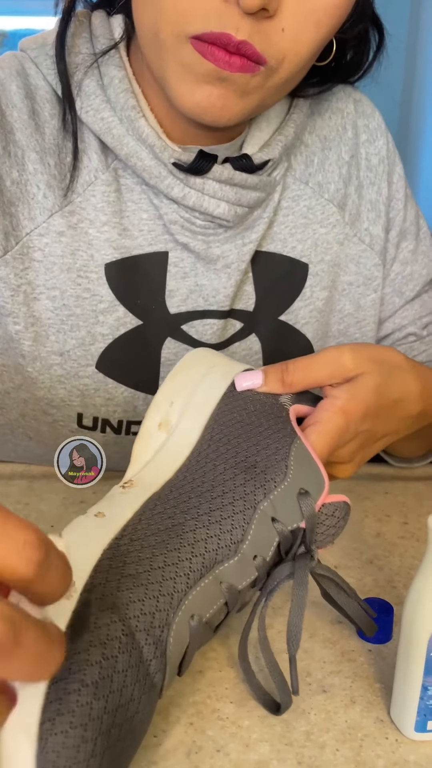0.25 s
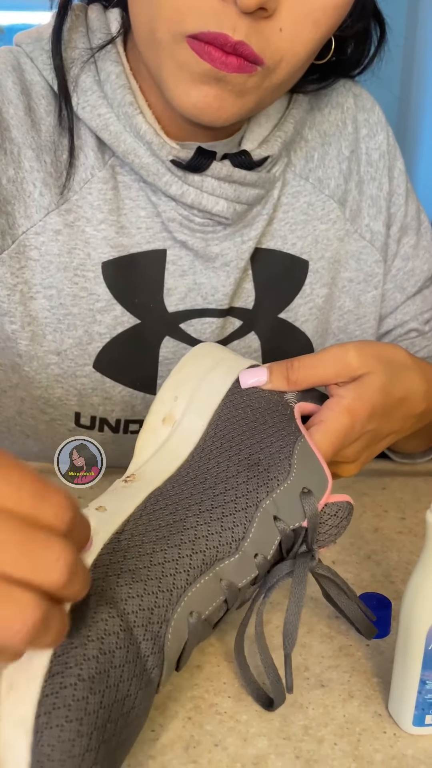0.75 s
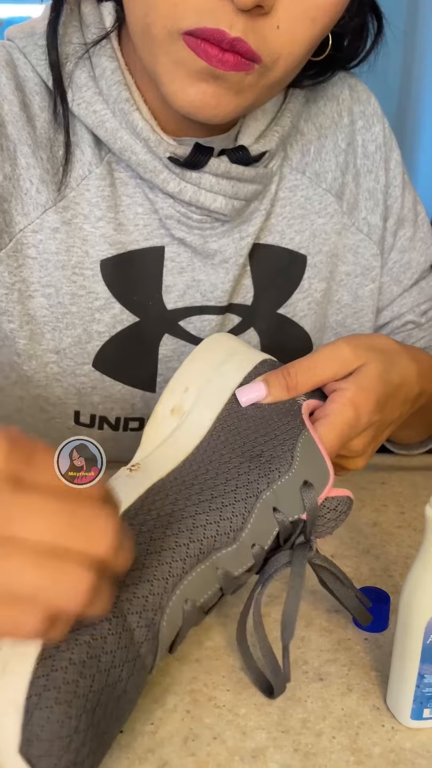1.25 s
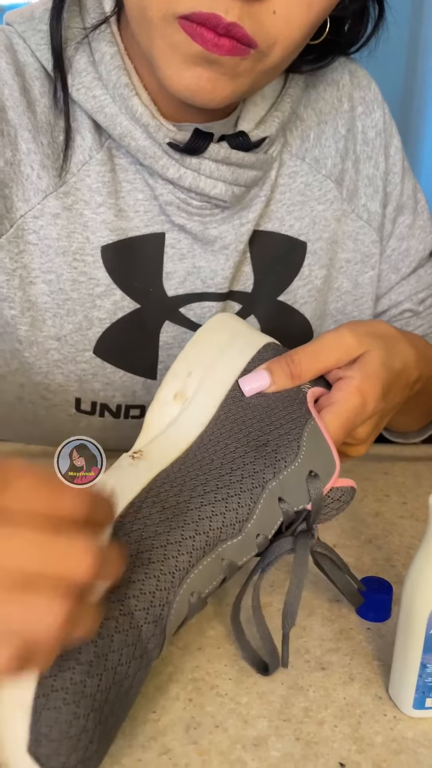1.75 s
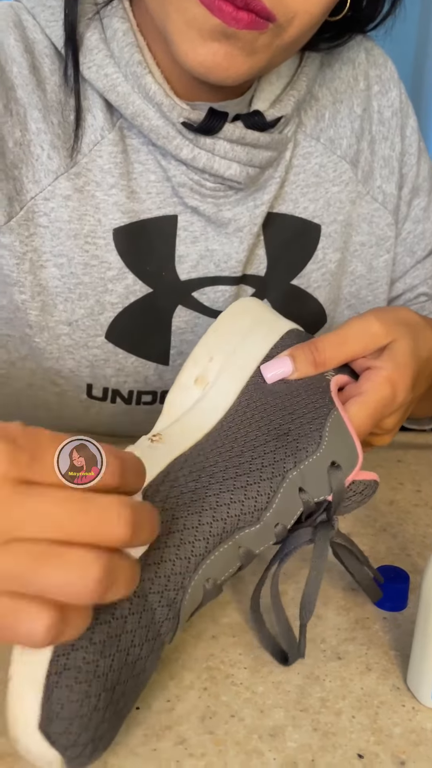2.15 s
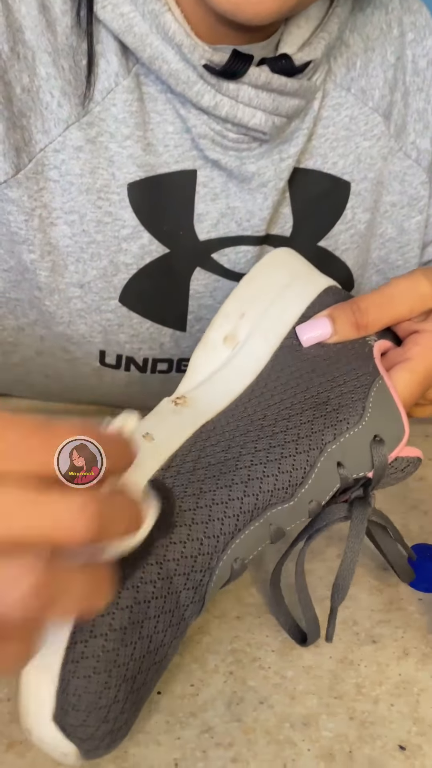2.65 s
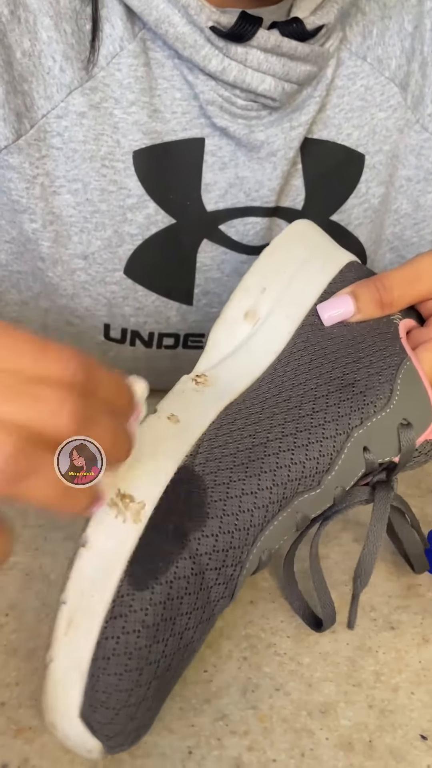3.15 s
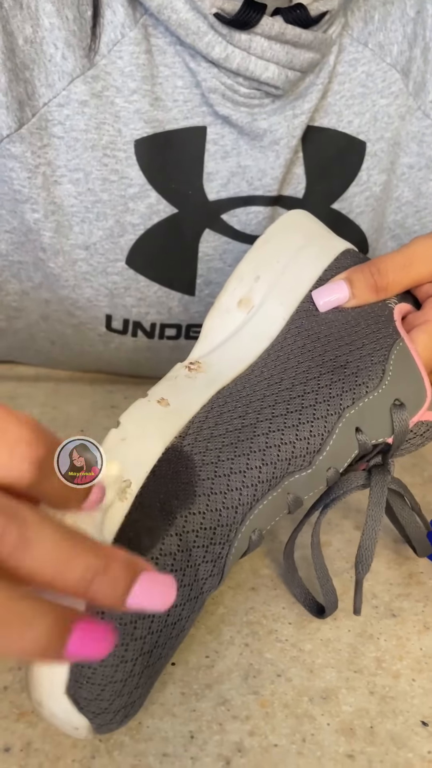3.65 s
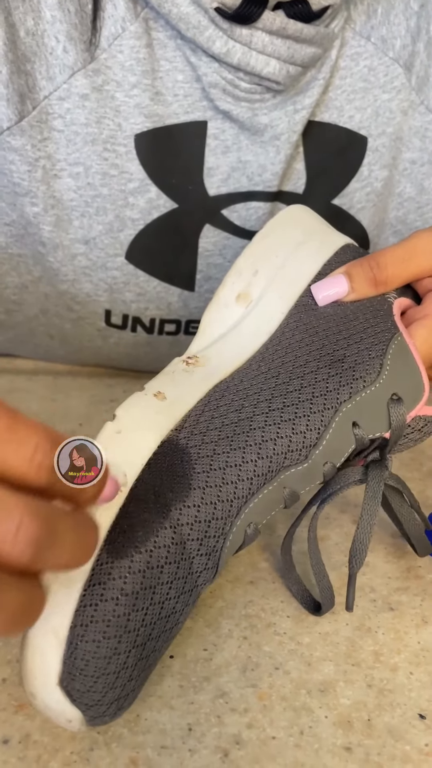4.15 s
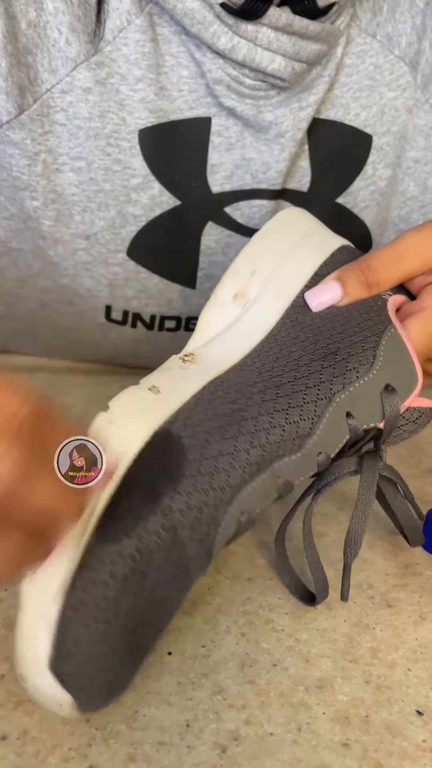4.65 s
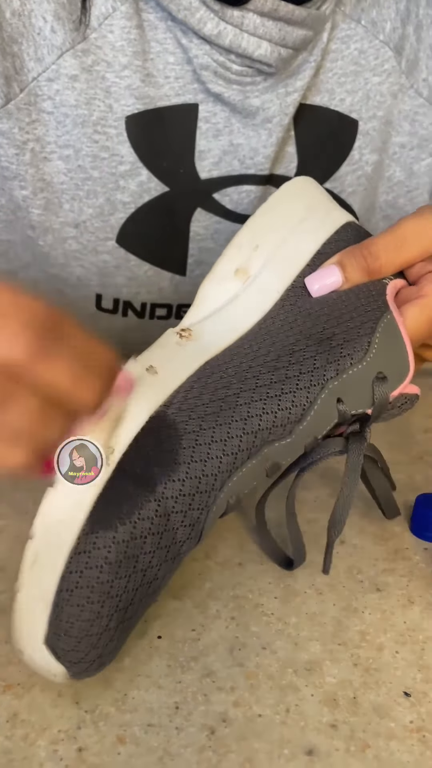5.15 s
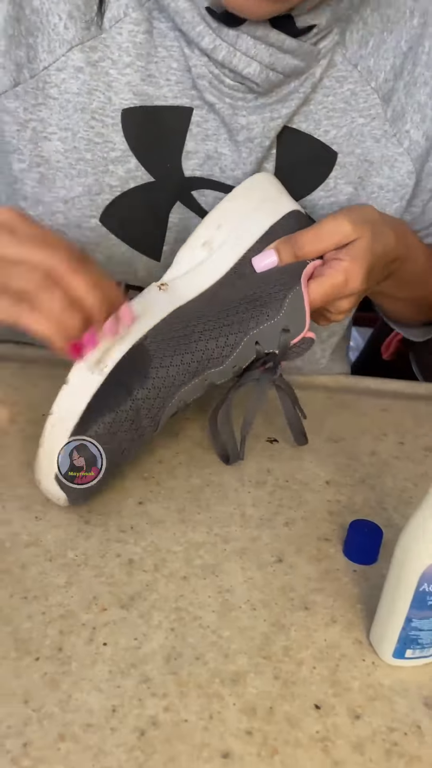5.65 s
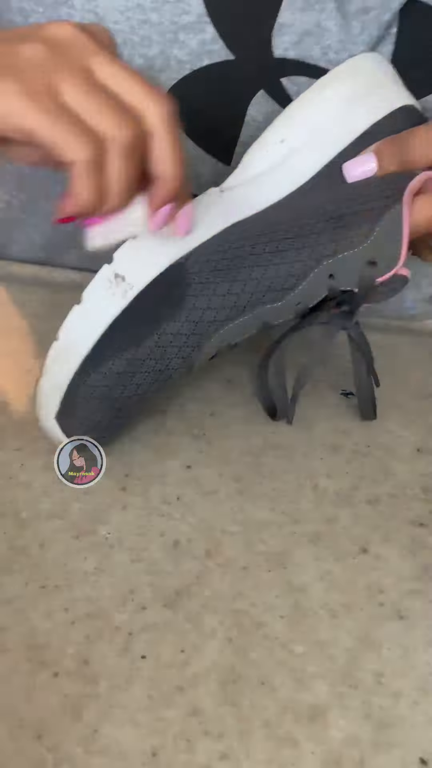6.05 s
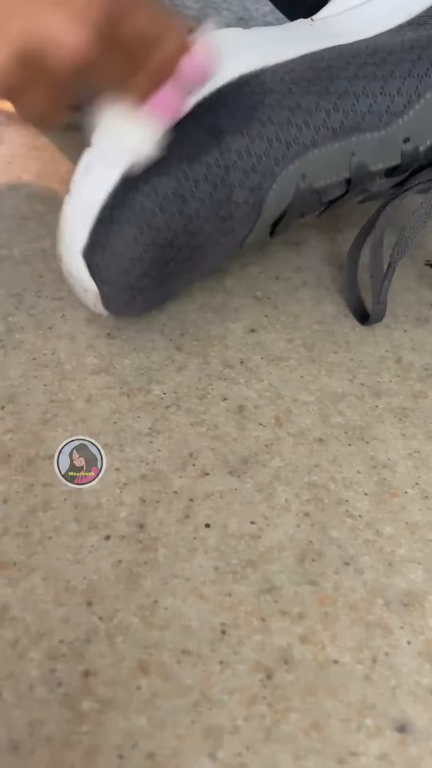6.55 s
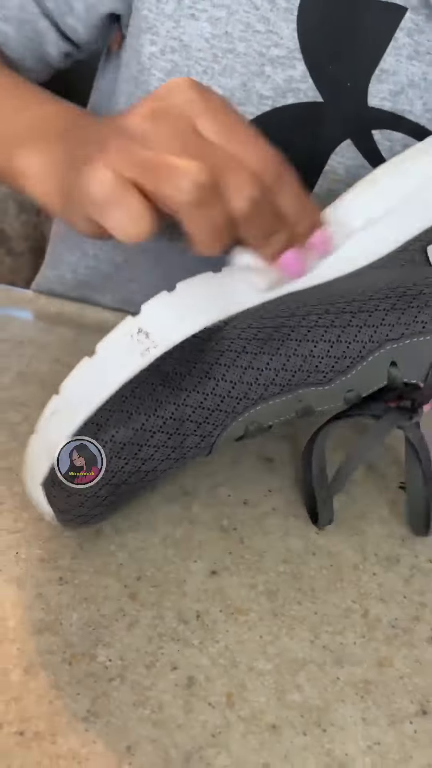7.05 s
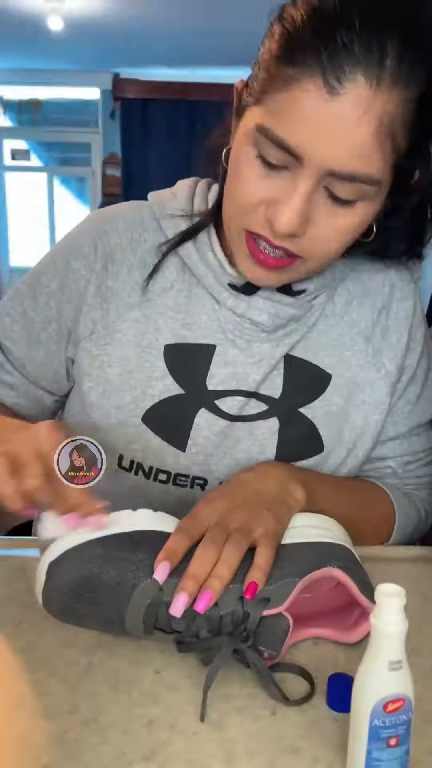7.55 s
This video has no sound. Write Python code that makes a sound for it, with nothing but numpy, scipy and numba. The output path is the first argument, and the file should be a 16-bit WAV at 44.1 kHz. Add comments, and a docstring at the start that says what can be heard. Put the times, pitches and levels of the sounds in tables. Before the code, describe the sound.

A cotton pad scrubs a rubber shoe sole in quick hissing strokes, with dull knocks on a counter and a low appliance hum.

```python
"""A cotton pad scrubs a rubber shoe sole close to a two-port phone: slipping fibres hiss, the shoe
rings hollow. Slow wipes alternate with regular strokes. An appliance hums, the counter wobbles in the
bass and the kitchen air rumbles; the shoe knocks on the counter, with a few short clicks. At CUT_S the
background dips and the scene cuts to sped-up, brighter scrubbing, with left and right no longer alike."""
import sys
import numpy as np
from scipy import signal
from scipy.fft import rfft, irfft
from scipy.io import wavfile
from scipy.ndimage import uniform_filter1d
from numba import njit

SR = 44100
rng = np.random.default_rng(int(sys.argv[2]) if len(sys.argv) > 2 else 0)


def unload_audio(sound):
    """Save the sound as a 16-bit wav file, at the path given as the first command line argument."""
    columns = np.transpose(np.atleast_2d(sound))
    # keep every value between -1 and 1, then stretch to whole-number steps
    steps = np.round(np.clip(columns, -1, 1) * 32767)
    wavfile.write(sys.argv[1], SR, steps.astype(np.int16))


N = 343980
CUT_S = 5.092  # the gate `cut` steps from 0 to 1 here
LEAN_DB = np.array([[1.2], [-1.2]])  # a slight pan to the left
# likeness of the rubbing at the two ports: (frequency [Hz], shared power [0..1])
RUB_LIKENESS = [(1200, 0.66), (2800, 0.088), (5500, 0.92), (7600, 1), (14200, 1)]
# low-end faders: (time [s], counter wobble [dB], air rumble [relative dB])
LOW_END = [(0, -46, -42.5), (1.9, -40.5, -42.5), (3.4, -37, -41.5), (4.7, -33.5, -44), (5.07, -28.5, -43.5),
           (5.199, -31, -40.5), (5.9, -50, -43), (6.4, -47, -42.5), (7.2, -23, -38.5), (7.8, -30, -35.5)]


def undb(db):
    """Decibels to gain."""
    return 10 ** (np.asarray(db) / 20)


def curve(x, points):
    """Straight lines through (x, value) breakpoints."""
    return np.interp(x, *np.transpose(points))


def unit(x):
    """Scale to rms 1."""
    return x / np.sqrt(np.mean(x ** 2))


def colour(x, hz, db):
    """EQ drawn on a log-frequency axis; the result has rms 1."""
    f = np.fft.rfftfreq(N, 1 / SR)
    return unit(irfft(rfft(x) * undb(np.interp(np.log(f + 1), np.log(hz), db)), N))


@njit
def glide(x, g, damping):
    """State-variable band-pass whose tuning g may move every sample."""
    y = np.empty_like(x)
    for c in range(x.shape[0]):
        band, low = 0., 0.
        for i in range(x.shape[1]):
            v = (band + g[i] * (x[c, i] - low)) / (1 + g[i] * (g[i] + damping[i]))
            band, low = 2 * v - band, low + 2 * g[i] * v
            y[c, i] = damping[i] * v
    return y


def ring(x, hz, width_hz):
    """One resonance, gain 1 at its steady or moving centre."""
    hz = hz * np.ones(x.shape[-1])
    return glide(np.atleast_2d(x), np.tan(np.pi * hz / SR), width_hz / hz).reshape(x.shape)


def walk(rate):
    """Random modulator of rms 1: values held 1 / rate s and slewed twice."""
    hold = int(SR / rate)
    steps = np.repeat(rng.standard_normal(N // hold + 1), hold)
    return unit(uniform_filter1d(uniform_filter1d(steps, hold), hold)[:N])


def ports(likeness, cut):
    """Noise at the two ports: partly shared at first, unrelated after the cut."""
    in_phase_below_hz, half_turn_hz = 4480, 3203  # the right port hears the treble later
    shared, left, right = rfft(rng.standard_normal((3, N)))
    f = np.fft.rfftfreq(N, 1 / SR)
    share = curve(f, likeness)
    turned = shared * np.exp(-1j * np.pi * np.maximum(f - in_phase_below_hz, 0) / half_turn_hz)
    own = np.array([left, right])
    alike = np.sqrt(share) * np.array([shared, turned]) + np.sqrt(1 - share) * own
    return (1 - cut) * irfft(alike, N) + cut * irfft(own, N)


def slow_wipes(t, rest_db):
    """Hiss level in dB of single wipes: it follows the speed of the pad."""
    # wipes: (start [s], rise [s], hold [s], fall [s], level [dB])
    wipes = [(0, 0.024, 0.21, 0.067, -40.5), (0.293, 0.027, 0.081, 0.16, -47),
             (0.408, 0.064, 0.034, 0.092, -41.5), (0.552, 0.13, 0.031, 0.53, -42),
             (0.75, 0.13, 0.048, 0.045, -36), (2.998, 0.12, 0.015, 0.038, -31.5),
             (3.158, 0.041, 0.022, 0.098, -36), (3.327, 0.044, 0.026, 0.033, -34.5),
             (3.422, 0.035, 0.034, 0.16, -35), (3.732, 0.099, 0.037, 0.099, -44.5),
             (3.959, 0.16, 0.036, 0.024, -50.5), (4.158, 0.068, 0.059, 0.15, -36)]
    level_db = np.full(N, rest_db)
    for at, rise, hold, fall, db in wipes:
        speed = np.clip(np.minimum((t - at) / rise, (at + rise + hold + fall - t) / fall), 0, 1)
        level_db = np.maximum(level_db, rest_db + (db - rest_db) * speed ** 0.68)
    return level_db


def regular_strokes(t, cut, rest_db):
    """Push and pull: hiss level, speed, travel along the sole and the crest of the lower hiss."""
    # strokes, each lasting until the next or longest_s: (start [s], full-swing level [dB])
    strokes = [(0.953, -33), (1.078, -32.5), (1.198, -30), (1.31, -30.5), (1.42, -29), (1.531, -28.5),
               (1.636, -29), (1.743, -30), (1.858, -29), (1.963, -30.5), (2.075, -29), (2.184, -30),
               (2.3, -28), (2.41, -30.5), (2.527, -28), (2.632, -30.5), (2.754, -28.5), (2.876, -31.5),
               (4.33, -32), (4.441, -28), (4.549, -31.5), (4.657, -28), (4.77, -29.5), (4.877, -29.5),
               (4.988, -31.5)]
    longest_s, turn_s, turn_db, stick = .13, 0.037, -50, 0.64
    start, swing_db = np.transpose(strokes)
    k = np.clip(np.searchsorted(start, t, "right") - 1, 0, len(start) - 1)
    length = np.minimum(np.diff(np.append(start, np.inf)), longest_s)[k]
    place = (t - start[k]) / length
    stroking = (place >= 0) & (place < 1)
    push = (-1.) ** (k + (start[k] > start.mean()))  # +1 push, -1 pull
    # pushes reach speed sooner than pulls; the pad sticks until driven hard enough
    arc = np.sin(np.pi * np.abs(place) ** (0.979 - 0.065 * push))
    speed = np.maximum(arc * length / turn_s - stick, 0)
    swing = np.tanh(speed) / np.tanh(length / turn_s - stick)
    level_db = np.where(stroking, turn_db + (swing_db[k] - turn_db) * swing, rest_db)
    # the lower hiss crests near mid stroke, late on a push, early on a pull
    crest = np.exp(-((place - .5 - 0.088 * push) / 0.087) ** 2)
    level_db = np.maximum(level_db, slow_wipes(t, rest_db))  # a louder wipe takes over
    spared_db = 0.39 * (swing_db[k] - level_db)  # the lower hiss dips less at the turns
    active = stroking * (1 - cut)
    crest_db = uniform_filter1d(active * (4.5 * (crest - .5) + spared_db), size=300)
    return level_db, active * speed, active * push * (place - .5), crest_db


def fibre_hiss(t, cut, slips, crest_db):
    """Cotton fibres slip over rubber; patches of tread scratch unevenly, so broad bands come and go."""
    # hiss EQ: (frequency [Hz], gain before the cut [dB], gain after [dB])
    spectrum = [(1020, -5, -3), (1460, -4, -7), (2020, -6, -5), (2950, -3.5, -4.5), (3650, 0, -2.5),
                (5300, 1, 0.5), (6300, 2, 1), (9100, 2.5, 1.5), (11130, 1, 1.5), (15650, -8.5, -6),
                (15900, 4, -0.5)]
    # moving bell on the lower hiss: (time [s], gain [dB])
    low_mids = [(0, -9), (.66, -14), (.72, 14), (.9, 6), (1.0, -1), (2.3, 5.5), (4.3, 2), (5.8, 6.5),
                (6.8, 1), (7.7, 2.5)]
    hz, before_db, after_db = np.transpose(spectrum)
    hiss = (1 - cut) * colour(slips, hz, before_db) + cut * colour(slips, hz, after_db)
    hiss = hiss + (undb(curve(t, low_mids) + crest_db) - 1) * ring(hiss, hz=1810, width_hz=2000)
    patch_hz, patchy_db = (1770, 3200, 6260, 10100), 1.52
    return hiss + sum((undb(patchy_db * walk(35)) - 1) * ring(hiss, f, 0.56 * f) for f in patch_hz)


def air_pockets(t, slips, bend):
    """Two pockets between fingers, pad and tread resonate and move as the grip changes."""
    # (time [s], lower pitch [Hz], lower level [relative dB], upper pitch [Hz], upper level [relative dB])
    pockets = [(2.1, 4380, -28, 5250, -14), (2.22, 4000, -20, 5250, -20), (2.58, 3740, -21, 5370, -16),
               (2.66, 4600, -18, 5500, -19), (2.86, 4570, -14, 5660, -3), (2.95, 4500, -14, 5300, -21.5),
               (4.4, 4650, -15, 5600, -11)]
    times, *grip = np.transpose(pockets)
    out = 0
    for hz, db in (grip[:2], grip[2:]):
        centre_hz = np.interp(t, times, hz) * (1 + 0.25 * (bend - 1))
        gain = undb(np.interp(t, times, db) + 1.5 * walk(30.4))
        out = out + gain * unit(ring(slips, centre_hz, width_hz=400))
    return out


def hollow_shoe(t, cut, bend, crest_db):
    """Rubbing rings the hollow of the shoe, which flares where the pad catches on the tread."""
    # shoe resonance: (time [s], pitch [Hz])
    pitch = [(4.9, 1150), (5.75, 1290), (6.15, 1370), (6.3, 1170)]
    # ring against the hiss: (time [s], level [relative dB])
    levels = [(0, -16), (.6, -24), (.75, 0), (1.05, -13), (1.4, -10.5), (2.6, -8.5), (3.5, -11),
              (3.85, -12), (4.25, -16.5), (5.4, -11.5), (6.0, -13.5), (6.3, -8), (6.85, -14.5), (7.2, -9),
              (7.4, -15.5), (7.8, -10.5)]
    # the pad catches: (time [s], boost [dB])
    catches = [(5.445, 6.9), (5.722, 13.7), (5.95, 12)]
    width_hz, catch_s = 225, 0.015
    rubs = ports(RUB_LIKENESS, cut) * undb(2.15 * walk(60))
    hz = curve(t, pitch) * bend * (1 + .025 * walk(9))
    hollow = unit(ring(ring(rubs, hz, width_hz), hz, 4.1 * width_hz))
    catch_db = sum(db * np.exp(-((t - at) / catch_s) ** 2) for at, db in catches)
    return undb(curve(t, levels) + catch_db + 1.18 * crest_db + LEAN_DB) * hollow


def scrub(t, cut):
    """The pad on the sole: loud in mid stroke, faint where the hand turns."""
    level_db, speed, travel, crest_db = regular_strokes(t, cut, rest_db=-66.5)
    level_db = np.where(cut, sped_up_scrubbing(t), level_db)
    level_db = uniform_filter1d(level_db, size=90) + 1.28 * walk(40)
    grit_db = 0.9 + 0.4 * cut  # slips differ in size, a few stand out
    slips = ports(RUB_LIKENESS, cut) * undb(grit_db * walk(900))
    hiss = fibre_hiss(t, cut, slips, crest_db)
    # resonances shift with the grip, lift with speed, climb along a push and sink along a pull
    bend = 1 + .015 * walk(10) + 0.02 * (speed - 1) + 0.14 * travel
    echo_s = .00096 / bend  # the counter mirrors the hiss by a path that follows the hand
    echo = .42 * np.array([np.interp(t - echo_s, t, port) for port in hiss])
    rubber_rasp = undb(crest_db - 18.5) * unit(ring(slips, 2370 * bend, width_hz=1080))
    before_cut = (1 - cut) * (echo + rubber_rasp + air_pockets(t, slips, bend))
    return undb(level_db) * (hiss + before_cut + hollow_shoe(t, cut, bend, crest_db))


def appliance_hum(t, cut, phase_spread):
    """A deep wavering hum; a weaker one beats against it until the cut."""
    # main hum: (time [s], rms level [dB])
    levels = [(5.08, -26.5), (5.7, -34.5), (6.3, -38), (6.8, -35.5), (7.8, -27)]
    main_hz, second_hz, second_db = 52.2, 62, -40.5
    main = np.sin(2 * np.pi * main_hz * t + 0.43 * walk(3.15) + 0.31 * phase_spread)
    second = np.sin(2 * np.pi * second_hz * t + 0.43 * walk(3.36))
    return np.sqrt(2) * (undb(curve(t, levels)) * main + undb(second_db) * (1 - cut) * second)


def appliance_whine(t):
    """Faint tones above the hum, joined by a low drone; all fade down for a second after the cut."""
    # whine: (pitch [Hz], level before the fade [dB], phase waver [rad])
    tones = [(471.4, -58.5, 1.5), (575.4, -48.5, 0.79), (682, -58, 1.6), (735, -55, 1.9)]
    # drone: (time [s], level before the fade [dB])
    drone_levels = [(2.9, -63), (3.2, -45), (5.09, -34.5), (5.2, -39)]
    drone_hz, fade_db = 134, -16
    whine = sum(undb(db) * np.sin(2 * np.pi * hz * t + waver * walk(8)) for hz, db, waver in tones)
    drone = undb(curve(t, drone_levels)) * np.sin(2 * np.pi * drone_hz * t + 0.37 * walk(5))
    return (whine + drone) * undb(fade_db * np.clip(t - CUT_S, 0, 1))


def counter_wobble(t, cut, phase_spread):
    """The counter wobbles on one unsteady bass note and heaves near the end."""
    # bass swells: (time [s], level [dB], width [s])
    heaves = [(7.32, -21.5, 0.034), (7.431, -6.5, 0.025), (7.54, -10.5, 0.049)]
    wobble_hz = 66.2
    times, wobble_db, _ = np.transpose(LOW_END)
    tone = np.sqrt(2) * np.sin(2 * np.pi * wobble_hz * t + 2 * walk(7) + phase_spread)
    heave = sum(undb(db) * np.exp(-((t - at) / width) ** 2) for at, db, width in heaves)
    return undb(cut * LEAN_DB) * tone * (undb(np.interp(t, times, wobble_db) + walk(11)) + heave)


def air_rumble(t, cut):
    """Kitchen air: dark, restless noise whose low mids thin out after the cut."""
    # room-tone EQ: (frequency [Hz], gain [dB])
    spectrum = [(25, -16), (45, -9.5), (75, -4.5), (135, -3), (295, -12.5), (578, -20.5), (991, -30.5),
                (2000, -45), (15000, -64)]
    # likeness at the two ports: (frequency [Hz], shared power [0..1])
    likeness = [(150, 0.99), (300, 0.74), (700, 0.03)]
    times, _, air_db = np.transpose(LOW_END)
    air = colour(ports(likeness, cut), *np.transpose(spectrum))
    air = air * undb(np.interp(t, times, air_db) + 7 + 1.93 * walk(12))
    return air + cut * (0.25 * ring(air, hz=187, width_hz=62) - 0.48 * ring(air, hz=276, width_hz=650))


def shoe_knocks():
    """The soft sole pushes the counter into ringing: the longer the push, the duller the knock."""
    # knocks: (time [s], peak [dB], push length before the cap [ms])
    knocks = [(0.136, -13, 16), (1.673, -15.5, 5.5), (2.843, -13, 13), (3.846, -18, 3.6), (4.672, -13, 7),
              (5.883, -20, 1.9), (6.104, -9, 1.9), (6.11, -1, 3.4), (6.515, -17, 3), (6.521, -7.5, 4.2),
              (7.635, -6.5, 6), (7.782, -11.5, 1.8)]
    # counter modes: (pitch [Hz], level [relative dB], 60 dB decay [s])
    modes = [(118, -7.5, 0.11), (154.5, 7.5, 0.095), (225.7, 7, 0.091), (467, -8, 0.029), (623, 6.5, 0.014),
             (1010, -33, 0.018)]
    cap_ms = 9
    out = np.zeros(N + SR)
    age = np.arange(SR // 4) / SR
    ringing = sum(undb(db - 60 * age / t60) * np.sin(2 * np.pi * hz * age) for hz, db, t60 in modes)
    for at, db, push_ms in knocks:
        push = np.hanning(int(min(push_ms, cap_ms) * SR / 1000) + 2)
        knock = np.convolve(ringing, push)
        i = int(at * SR)
        out[i:i + len(knock)] -= undb(db) * knock / np.abs(knock).max()
    return out[:N]


def short_clicks():
    """Bursts of tuned noise: three high ticks, one light knock and the bright edge of the 3.85 s knock."""
    # clicks: (time [s], peak [dB], pitch [Hz])
    clicks = [(0.67, -31, 7400), (0.929, -26, 564), (3.259, -23.5, 11000), (3.285, -25, 10800),
              (3.841, -30, 980)]
    out = np.zeros(N)
    age = np.arange(900) / SR
    for at, db, hz in clicks:
        burst = rng.standard_normal(len(age)) * np.exp(-age * np.sqrt(hz) / 0.076)  # higher dies sooner
        click = ring(ring(burst, hz, hz / 3), hz, hz / 2)
        i = int(at * SR)
        out[i:i + len(click)] += undb(db) * click / np.abs(click).max()
    return out


def sped_up_scrubbing(t):
    """Hiss level in dB of the sped-up scrubbing after the cut: a fast shallow throb with brief dropouts."""
    # hiss fader: (time [s], level [dB])
    levels = [(5.1, -36), (5.45, -36.5), (6.2, -38.5), (6.4, -35), (6.85, -32), (7.15, -32.5), (7.28, -35),
              (7.62, -28), (7.8, -32)]
    # dropouts: (middle [s], length [s], drop [dB])
    dropouts = [(5.166, 0.0041, 5.5), (5.752, 0.012, 12.5), (6.012, 0.019, 3.5), (6.074, 0.0045, 8.5),
                (6.131, 0.0046, 5.5), (6.244, 0.02, 5), (6.712, 0.11, 29.5), (6.945, 0.0045, 6.5),
                (6.983, 0.0035, 8), (7.232, 0.021, 12), (7.463, 0.0039, 11.5), (7.518, 0.0042, 13.5),
                (7.687, 0.0039, 9), (7.762, 0.027, 10)]
    slope_db_per_s, throb_db, throb_hz = 627, 1.95, 26
    drop_db = sum(np.clip(db - (np.abs(t - at) - span / 2) * slope_db_per_s, 0, db)
                  for at, span, db in dropouts)
    cycles = np.cumsum(throb_hz * (1 + 0.1353 * walk(4.3))) / SR
    return curve(t, levels) - drop_db + throb_db * np.sin(2 * np.pi * cycles)


def scene():
    """Scrubbing, kitchen bed and knocks; after the cut the knocks sound wide, the left delayed 2.7 ms."""
    t = np.arange(N) / SR
    cut = (t >= CUT_S) * 1.
    low_cut = signal.butter(1, 60, "high", output="sos", fs=SR)
    impacts = signal.sosfilt(low_cut, shoe_knocks() + short_clicks())
    left_impacts = np.interp(t - 0.0027 * cut, t, impacts)
    scrubbing = scrub(t, cut)
    phase_spread = cut * np.array([[1], [-1]]) * (.95 + .2 * walk(6))  # left and right wander apart
    kitchen = appliance_hum(t, cut, phase_spread) + appliance_whine(t)
    kitchen = kitchen + counter_wobble(t, cut, phase_spread) + air_rumble(t, cut)
    dip = 1 - cut * np.exp(-np.maximum(t - CUT_S, 0) / 0.074)
    return scrubbing + dip * kitchen + np.array([left_impacts, impacts])


def record(dry):
    """The phone cuts the top steeply."""
    top_hz = 15550
    return signal.sosfilt(signal.ellip(14, .3, 80, top_hz, fs=SR, output="sos"), dry)


dry = scene()
out = record(dry)
unload_audio(out)
```